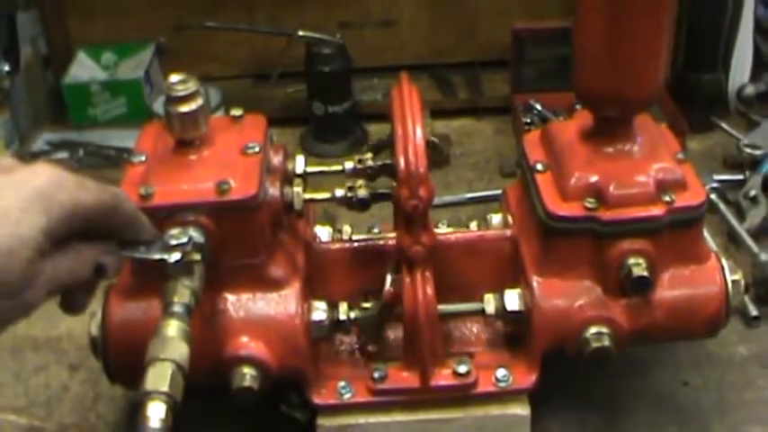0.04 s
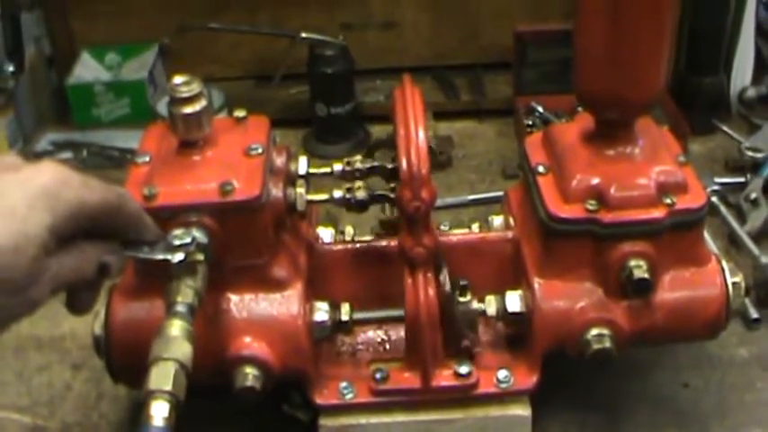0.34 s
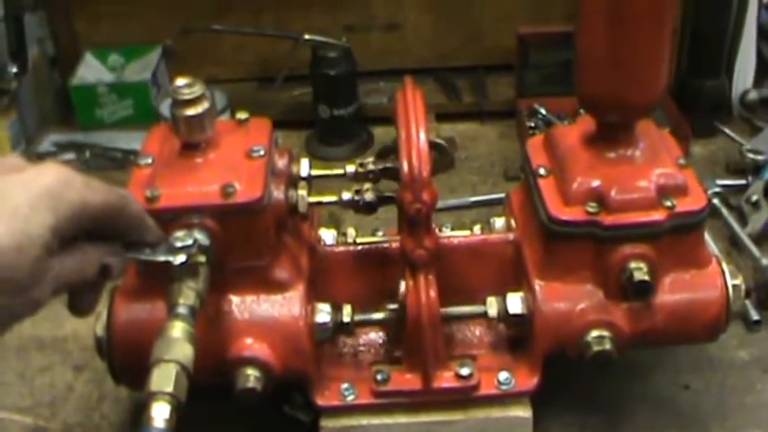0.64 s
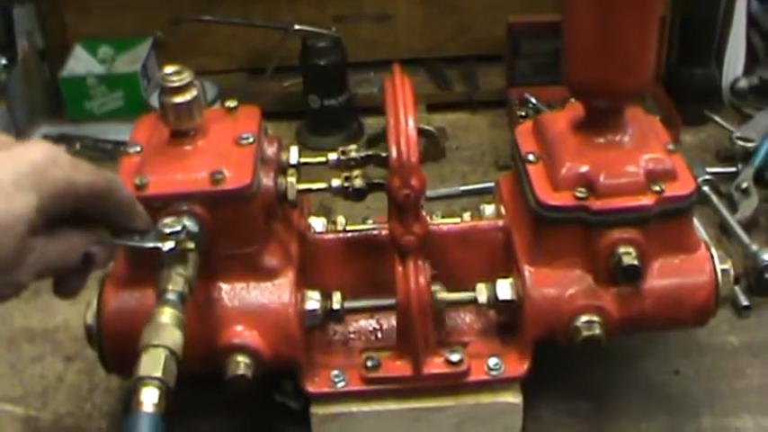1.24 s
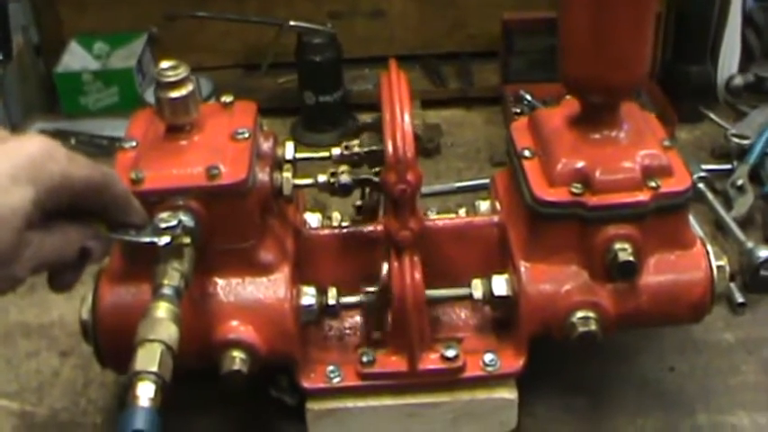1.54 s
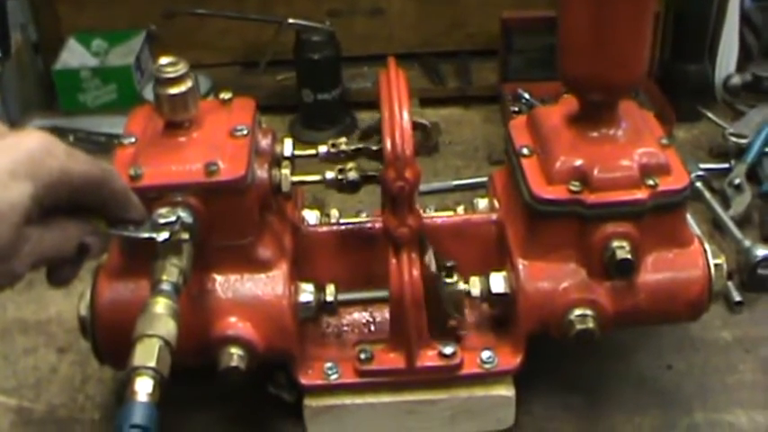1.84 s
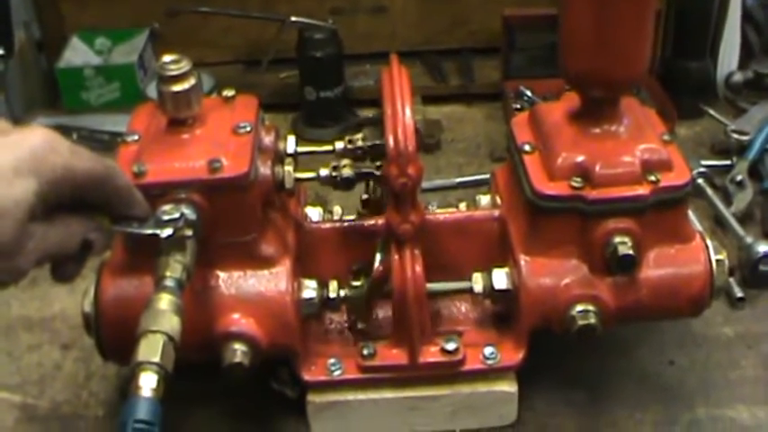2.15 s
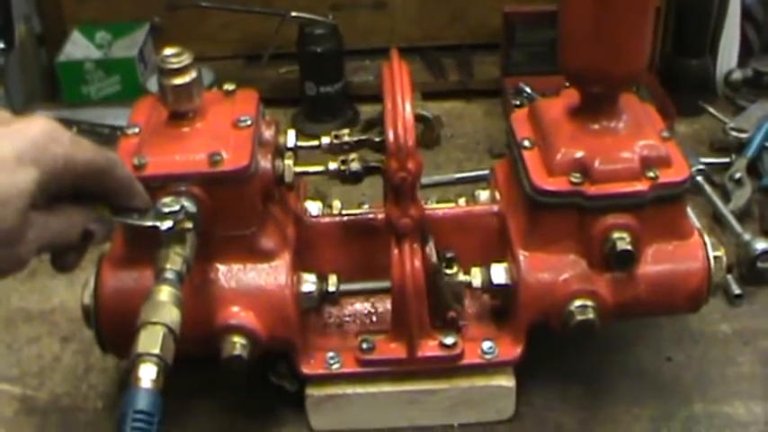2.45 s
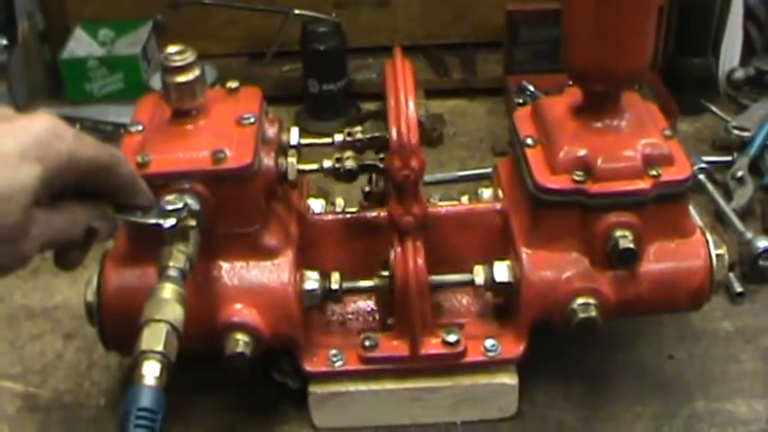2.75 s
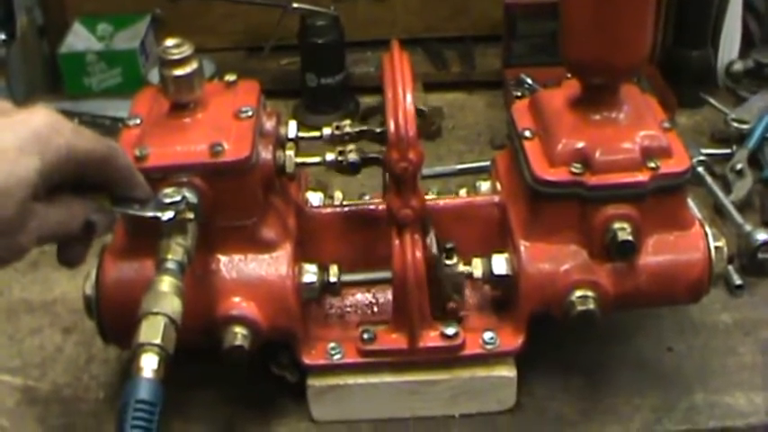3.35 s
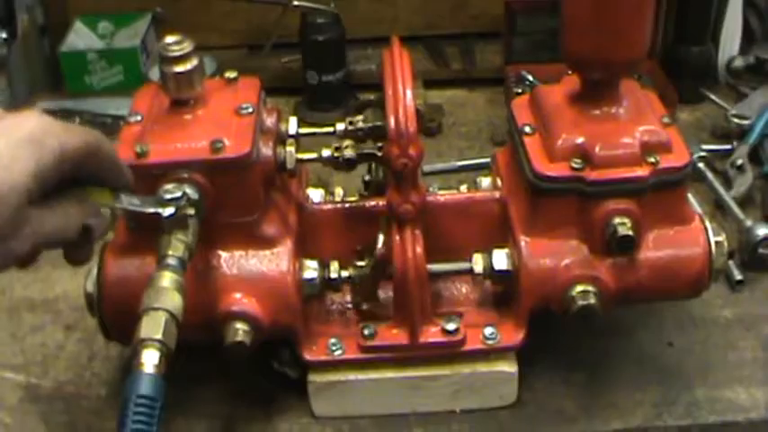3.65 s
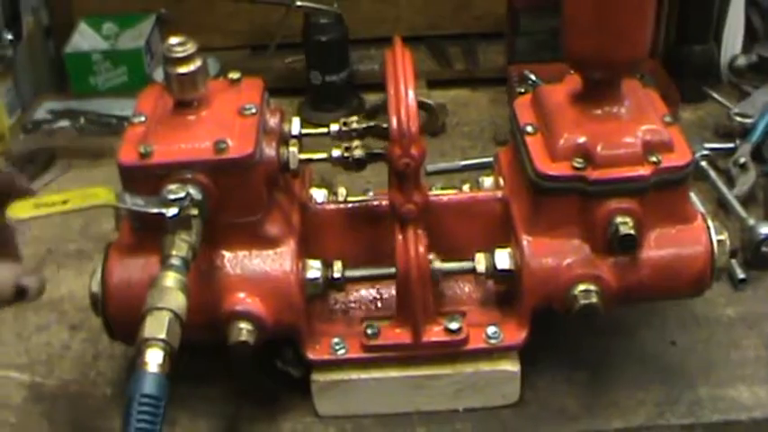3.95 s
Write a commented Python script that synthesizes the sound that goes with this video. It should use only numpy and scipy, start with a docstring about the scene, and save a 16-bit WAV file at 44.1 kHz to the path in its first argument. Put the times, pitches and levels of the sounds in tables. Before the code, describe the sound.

Close up in a workshop, a small air-driven piston pump beats out regular, alternating thuds that gradually slow. Leaking air hisses loudly the whole time, while the exhaust puffs with each stroke and the valve gear squeaks faintly.

```python
"""A small duplex piston pump thuds on a workshop bench, run on compressed air; it slows as the valve eases.
The pistons strike alternate ends of their travel and ring pump and bench, treble arriving before bass.
Soft knocks fall in mid-stroke, the valve gear squeaks and the exhaust breathes with the strokes.
Air hisses throughout in the resonances of the ports, and whistles and rubs at fixed points of the cycle.
Behind it all sit the short echoes and faint rumble of the workshop."""
import sys
import numpy as np
from scipy import signal
from scipy.fft import rfft, irfft
from scipy.io import wavfile
from scipy.ndimage import uniform_filter1d

SR = 44100
rng = np.random.default_rng(int(sys.argv[2]) if len(sys.argv) > 2 else 0)


def waveform_to_disk(signal):
    """Save audio, clipped to [-1, 1], as 16-bit WAV at the path in sys.argv[1]."""
    frames = np.transpose(np.atleast_2d(signal))
    scaled = np.clip(frames, -1, 1) * 32767
    samples = np.round(scaled).astype(np.int16)
    wavfile.write(sys.argv[1], SR, samples)


N = 176400

# Thuds at the left and right ends of travel. Each row: start in seconds, relative level in dB.
LEFT_THUDS = [(0.0258, 3), (0.568, 2), (1.111, 3), (1.6552, 2.5), (2.2025, 2), (2.8956, 0), (3.707, 0.5)]
RIGHT_THUDS = [(0.29, 1), (0.8333, 1), (1.377, 1), (1.9226, 1), (2.486, 0.91), (3.2977, -0.66)]


def undb(db):
    """Decibels to gain."""
    return 10 ** (np.asarray(db) / 20)


def unit(x):
    """Scale to rms 1."""
    return x / np.sqrt(np.mean(x ** 2))


def curve(points):
    """An EQ curve: the gain at every frequency bin, from (Hz, dB) points."""
    hz, db = np.array(points, float).T
    bin_hz = np.arange(N // 2 + 1) * SR / N + 1
    return undb(np.interp(np.log(bin_hz), np.log(hz), db))


def noise(gain):
    """Noise of rms 1, coloured by a gain per frequency bin."""
    return unit(irfft(rfft(rng.standard_normal(N)) * gain, N))


def resonance(hz, width_hz):
    """Turbulence ringing one resonance: a breathy pitch."""
    f = np.arange(N // 2 + 1) * SR / N + 1
    return noise(1 / (1 + 1j * (f * f - hz * hz) / (f * width_hz)))


def drift(rate_hz):
    """Smooth random wander of rms 1."""
    hold = max(int(SR / rate_hz), 2)
    steps = np.repeat(rng.standard_normal(N // hold + 1), hold)
    return unit(uniform_filter1d(uniform_filter1d(steps, hold), hold)[:N])


def rumble():
    """The faint, steady rumble of the workshop, independent in each channel."""
    # Rumble colour. Each row: frequency in Hz, relative level in dB.
    spectrum = [(20, 0), (45, 8), (75, -3), (110, -15), (200, -20), (600, -60)]
    return undb(-63) * np.array([noise(curve(spectrum)), noise(curve(spectrum))])


def room(x):
    """Diffuse workshop echoes: half-octave bands of dying noise that fade in after a short gap."""
    # Reverb tail. Each row: frequency in Hz, level in dB, time to fall 60 dB in seconds.
    reverb = [(59.4, -22, .25), (150, -8.5, 0.19), (300, -16, 0.3), (450, -16, .2), (630, -14.5, 0.23),
              (1090, -10, 0.17), (2200, -1.5, .13), (5000, -8, 0.12)]
    hz, levels, decays = np.array(reverb).T
    t, tail = np.arange(N // 6) / SR, 0
    gap_s = 0.015
    fade_in = np.clip(t / gap_s - 1, 0, 1)
    for centre in 60 * 2 ** (np.arange(13) / 2):
        db = np.interp(np.log(centre), np.log(hz), levels)
        t60 = np.interp(np.log(centre), np.log(hz), decays)
        bandpass = signal.butter(2, centre * 2 ** (np.array([-1, 1]) / 4), "band", fs=SR, output="sos")
        band = signal.sosfilt(bandpass, rng.standard_normal(len(t)))
        band *= np.exp(-np.log(1000) * t / t60) * fade_in
        tail += band * undb(db) * np.sqrt(centre * np.log(2) / SR / np.sum(band ** 2))
    return signal.fftconvolve(x, tail)[:N]


def cycle():
    """The pump's place in its cycle (0-2 strokes after a left thud) and its slowness (0 fast, 1 slow)."""
    ends = np.sort([s for s, db in LEFT_THUDS + RIGHT_THUDS])
    ends = np.r_[2 * ends[0] - ends[1], ends, 2 * ends[-1] - ends[-2]]  # one more stroke at each end
    t, lengths = np.arange(N) / SR, np.diff(ends)
    place = (np.interp(t, ends, np.arange(len(ends))) - 1) % 2
    slow = np.interp(t, ends[:-1] + lengths / 2, (lengths - lengths.min()) / np.ptp(lengths))
    return place, slow


def exhaust(place, slow):
    """Spent air rushes out early in each stroke and slackens as the piston nears its end."""
    # Exhaust colour. Each row: frequency in Hz, relative level in dB.
    spectrum = [(25, -38), (70, -23), (110, -3.5), (170, -8), (275, 3.5), (350, -2), (470, -8), (640, 1.5),
                (760, -1.5), (1100, 2), (1500, -3.5), (2200, -16.5), (3500, -20)]
    # Flow through the cycle. Each row: place in strokes, relative level in dB.
    flow = [(0, 6.5), (.25, 5), (.5, 2.5), (.75, 0.5), (.95, 0.5), (1.2, 6), (1.5, 2.5), (1.72, 4.5),
            (1.87, -1.5), (2, 2)]
    db = -36.5 + np.interp(place, *np.array(flow).T) - 1.5 * slow + 1.96 * drift(40)
    return undb(db) * noise(curve(spectrum))


def hiss(place, slow):
    """Leaking air: a fluttering jet, wavering ports, and whistles and chamber tones tied to the cycle."""
    # Broad jet noise. Each row: frequency in Hz, relative level in dB.
    jet = [(1200, -24), (1700, -7.5), (2000, -5), (2600, -3.5), (3400, -2.5), (4200, -1), (5000, -2),
           (5900, -2), (6700, -0.8), (7400, -3.5), (8400, -0.6), (10400, 0.5), (12000, -1.5), (13500, 3.5),
           (14300, -11), (15500, -5)]
    # Resonances of the air passages. Each row: frequency in Hz, width in Hz, relative level in dB.
    ports = [(2180, 70, -7), (2568, 63, -8.5), (3105, 20, -6.5), (3740, 210, -9), (4595, 21.6, 3),
             (5230, 30, -5), (5570, 15, -13.5), (5520, 90, -10.5), (6176, 45, 0), (6640, 15.5, 4.5),
             (6670, 41, 1), (7120, 260, -9.5), (8080, 34, -7), (8230, 135, -3.7), (8560, 40, -11.5),
             (9060, 24, 1.5), (9220, 87, -10.5), (9630, 44, 0.5), (10000, 79, -1.5), (10600, 165, -1),
             (11430, 77, -3), (11970, 62, -10.5), (12170, 130, -8), (12300, 67, -16), (12970, 190, -4),
             (13500, 25, -4), (14040, 37, -14), (15041, 130, -22)]
    # Whistles and rubs, once a cycle. Each row: place in strokes, spread in strokes, frequency in Hz,
    # width in Hz, level in dB, change when slow in dB.
    whistles = [(0.47, 0.04, 3050, 300, -30, -5), (0.56, 0.027, 6500, 1100, -25, -14),
                (1.62, 0.02, 2810, 180, -25, -2.5), (1.55, 0.032, 5160, 95, -28.5, -19),
                (1.73, 0.12, 2170, 60, -32, -5.5), (1.62, 0.14, 12000, 300, -35, 3),
                (1.34, 0.15, 10800, 120, -27.5, -5), (1.86, .15, 4600, 60, -36, -6)]
    # Two chamber resonances take turns as the piston travels.
    # Each row: place in strokes, level of the upper in dB, level of the lower in dB.
    chamber = [(0, -30, -69), (.25, -26.5, -46), (.5, -32, -31.5), (.7, -34, -27), (.98, -63, -29),
               (1.15, -37, -37), (1.65, -41, -60), (1.82, -29.5, -46), (2, -27, -48)]
    chamber_hz = 8990, 8260
    air = undb(-22.5 + 1.3 * drift(45)) * noise(curve(jet))
    port_tones = sum(undb(db + 1.5 * drift(18)) * np.sqrt(width) * resonance(hz, width)
                     for hz, width, db in ports)
    air += undb(-22.5) * unit(port_tones)
    for at, spread, hz, width, db, slow_db in whistles:
        strokes_away = (place - at + 1) % 2 - 1
        swell = np.exp(-.5 * (strokes_away / spread) ** 2)
        air += undb(db + slow_db * slow) * swell * resonance(hz, width)
    places, *levels = np.array(chamber).T
    for hz, db in zip(chamber_hz, levels):
        air += undb(np.interp(place, places, db)) * resonance(hz, width_hz=135)
    return air


def squeaks():
    """Brief, unsteady tones from the sliding valve gear."""
    # Each row is one squeak: time of its peak in seconds, pitch in Hz, level in dB.
    slides = [(.247, 3700, -27), (0.543, 3650, -22.5), (.803, 3810, -28), (1.083, 3630, -24.5),
              (1.627, 3660, -24.5), (3.657, 3030, -34), (3.66, 3700, -29)]
    spread_s, jitter_hz = .011, 50
    t, out = np.arange(N) / SR, 0
    for s, hz, db in slides:
        tone = np.sqrt(2) * np.sin(2 * np.pi * np.cumsum(hz + jitter_hz * drift(500)) / SR)
        out += undb(db) * np.exp(-.5 * ((t - s) / spread_s) ** 2) * tone
    return out


def ring(modes, lag_at_200_hz_s=0.00653):
    """Pump and bench ring from one blow; bending waves are slower in the bass, so it chirps downward."""
    rise_s, low_hz, fastest_hz = 0.001, 97, 1204
    t, body = np.arange(N // 4) / SR, 0
    for hz, db, t60 in modes:
        envelope = (1 - np.exp(-t / rise_s)) * np.exp(-np.log(1000) * t / t60)
        body += undb(db) * envelope * np.sin(2 * np.pi * hz * t)
    f = np.arange(len(t) // 2 + 1) * SR / len(t)
    lag = lambda hz: 1 / np.sqrt(np.clip(hz, low_hz, fastest_hz)) - 1 / np.sqrt(fastest_hz)
    delay_s = lag_at_200_hz_s * lag(f) / lag(200)
    chirp = irfft(rfft(body) * np.exp(-2j * np.pi * np.cumsum(delay_s) * f[1]), len(t))
    # The bench radiates little between its first two groups of modes, or in the deep bass.
    hollowed = signal.lfilter(*signal.iirnotch(435, Q=2.74, fs=SR), chirp)
    return signal.sosfilt(signal.butter(2, low_hz, "high", fs=SR, output="sos"), hollowed)


def strike(events, response):
    """Trigger a ringing response at each (seconds, dB) blow."""
    blows = np.zeros(N)
    for s, db in events:
        blows[int(np.clip(s * SR, 0, N - 1))] += undb(db)
    return signal.fftconvolve(blows, response)[:N]


def pistons():
    """Pistons thud at the ends of travel and knock in mid-stroke; the body rocks before each right thud."""
    # Modes of pump and bench for left thuds, right thuds and knocks.
    # Each row: frequency in Hz, relative level in dB, time to fall 60 dB in seconds.
    left_modes = [(105, -49, 0.28), (161, -28, 0.136), (200, -22, 0.064), (265.3, -20.5, 0.16),
                  (281.8, -23, 0.16), (622, -23, 0.06), (647.4, -21.5, .12), (953, -18, 0.034),
                  (1017, -23, 0.17), (1140, -7.5, 0.02), (1377, -17, 0.025), (1794, -28, 0.071),
                  (1864, -29, 0.1), (2056, -21.5, 0.036)]
    right_modes = [(113, -36, 0.21), (201, -24.5, 0.1), (224, -22.5, 0.15), (279, -18.5, 0.15),
                   (323, -52, 0.09), (613, -20.5, 0.062), (634, -38, 0.086), (888, -20.5, 0.059),
                   (1103, -20.5, 0.024), (1178, -13.5, 0.027), (1196, -14.5, 0.012), (1490, -25.5, 0.04),
                   (1807, -26, 0.064)]
    knock_modes = [(128, -44, 0.29), (185, -23.5, 0.067), (243, -29, 0.097), (620, -30, .06),
                   (880, -35, 0.024)]
    # Soft knocks of the other piston. Each row: start in seconds, relative level in dB.
    knocks = [(.482, 1), (1.026, 4), (1.571, 3), (2.118, 3), (3.221, -7)]
    lurch_lead_s, lurch_mode = 0.0327, (107.8, -40.5, 0.13)
    left = undb(-1) * strike(LEFT_THUDS, ring(left_modes))
    right = undb(1) * strike(RIGHT_THUDS, ring(right_modes, lag_at_200_hz_s=0.0044))
    lurch = strike([(s - lurch_lead_s, db) for s, db in RIGHT_THUDS], ring([lurch_mode]))
    return left + right + lurch + strike(knocks, ring(knock_modes))


def scene():
    """Pump and air in front of a stereo microphone whose sides hear the bench out of step."""
    # Stereo width of the pump, of the diffuse hiss, and of the air that leads on the left.
    # Each row: frequency in Hz, side level in dB.
    pump_width = [(30, -1), (80, -22), (170, -8.5), (330, -6), (700, -3), (1300, -5.5), (2500, -4),
                  (6000, -12)]
    hiss_width = [(1800, -8.5), (4500, -18.5), (8000, -19.5), (11000, -11), (13000, -10), (16000, -3)]
    air_lead = [(1800, -30), (4500, -9), (8000, -42), (11000, -26), (13700, -7), (16000, -13)]
    # Panning. Each row: frequency in Hz, left minus right in dB.
    balance = [(40, -8), (110, 0), (380, -.5), (700, -1.5), (2400, 0), (4400, .5), (8100, 0), (14000, -1.5)]
    place, slow = cycle()
    blows = pistons()
    pump = blows + room(blows) + exhaust(place, slow)
    # A side signal turned a quarter cycle (1j) puts left and right out of step.
    pump_side = irfft(rfft(pump) * 1j * curve(pump_width), N) + undb(-5) * room(blows)
    air = hiss(place, slow) + squeaks()
    diffuse_spectrum = rfft(hiss(place, slow)) * curve(hiss_width)
    air_side = irfft(diffuse_spectrum + 1j * rfft(air) * curve(air_lead), N)
    mid, side = pump + air, pump_side + air_side
    stereo = np.array([mid + side, mid - side]) + rumble()
    lean = np.sqrt(curve(balance))
    return irfft(rfft(stereo) * np.array([lean, 1 / lean]), N)


def record(dry):
    """A steep low-pass trims the very top of the hiss."""
    top_hz = 15750
    return signal.sosfilt(signal.ellip(10, .2, 80, top_hz, fs=SR, output="sos"), dry)


dry = scene()
out = record(dry)
waveform_to_disk(out)
```